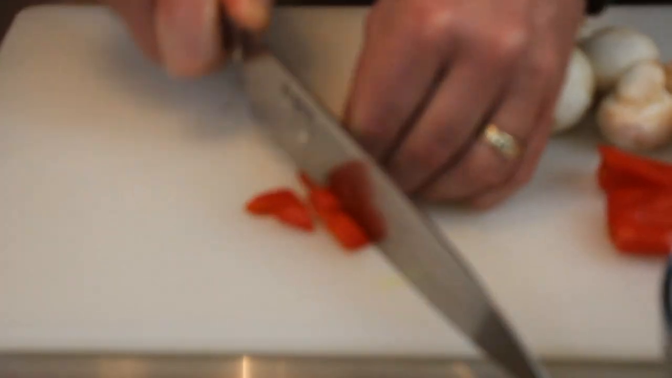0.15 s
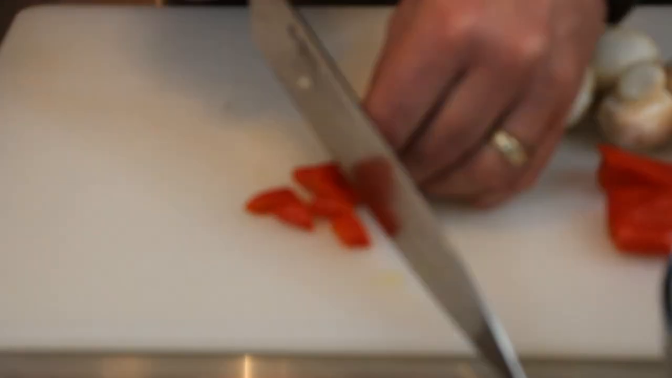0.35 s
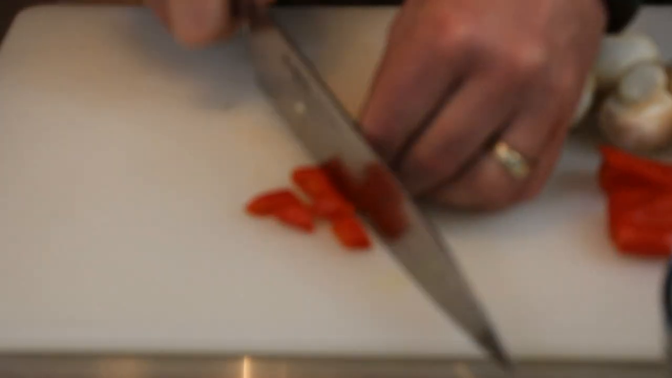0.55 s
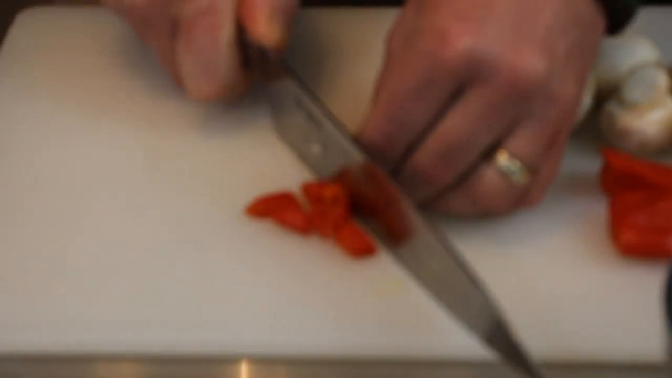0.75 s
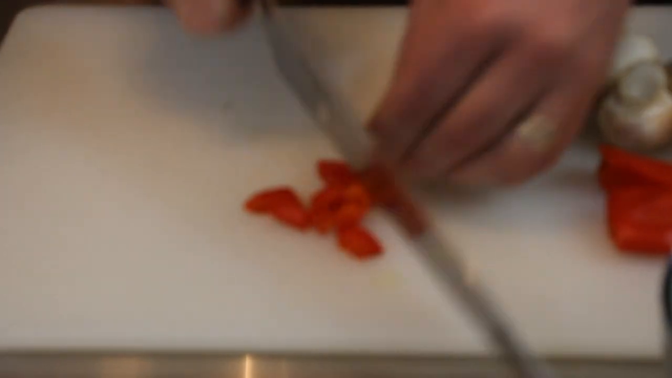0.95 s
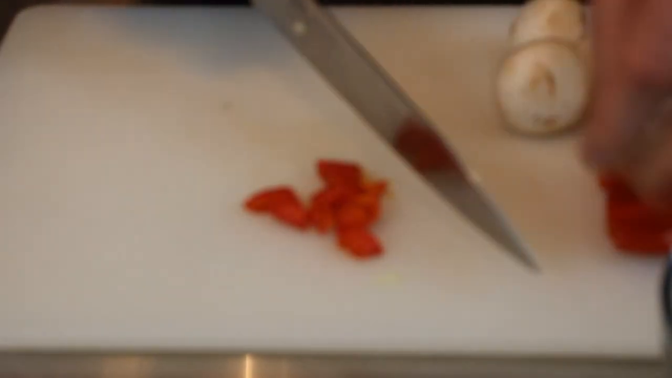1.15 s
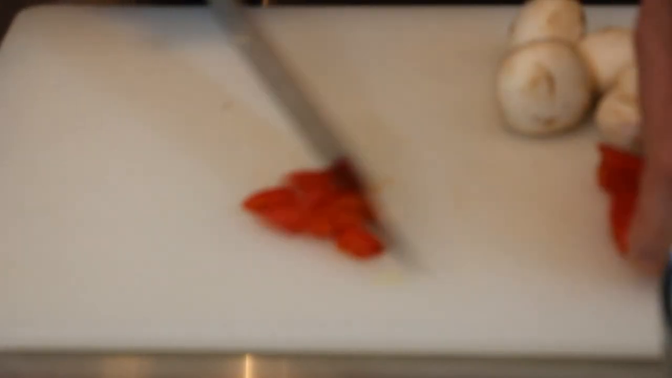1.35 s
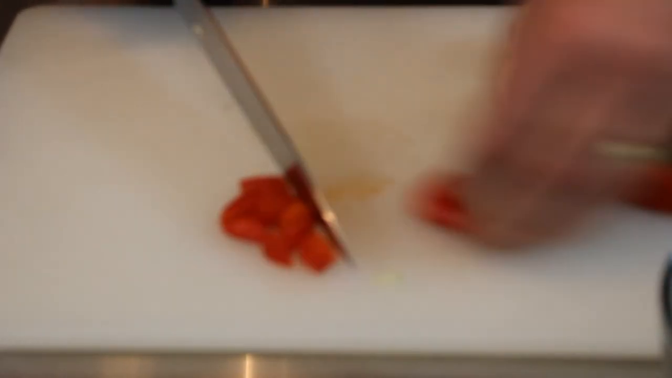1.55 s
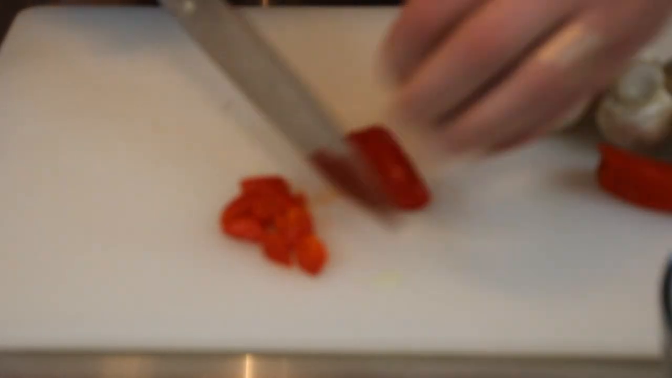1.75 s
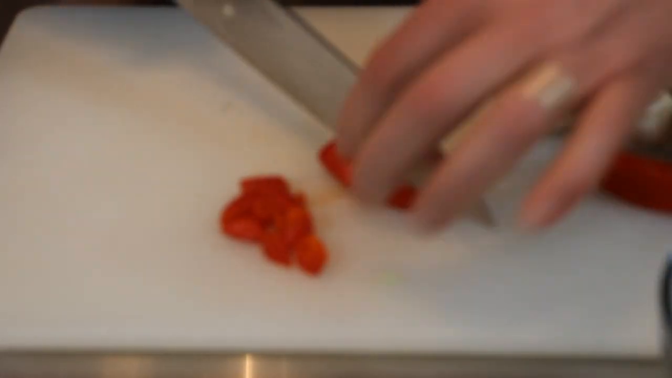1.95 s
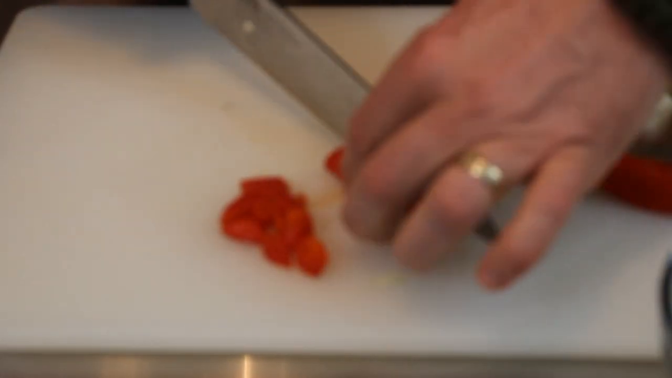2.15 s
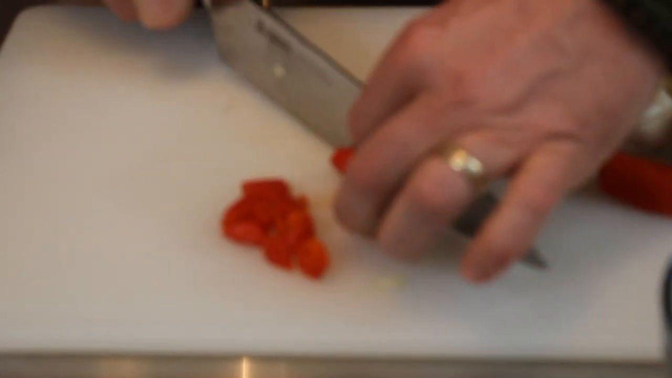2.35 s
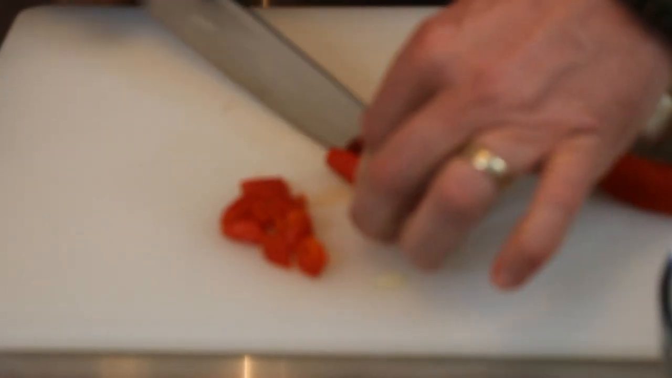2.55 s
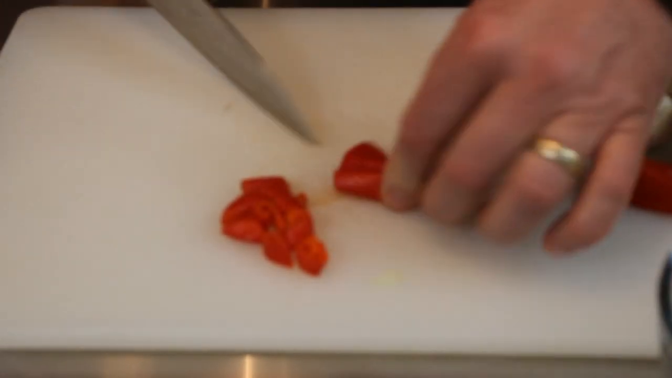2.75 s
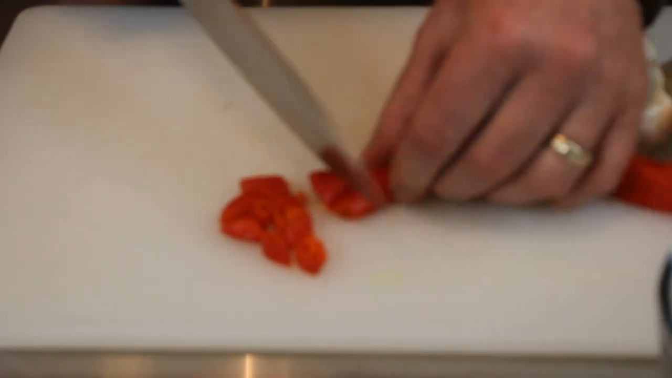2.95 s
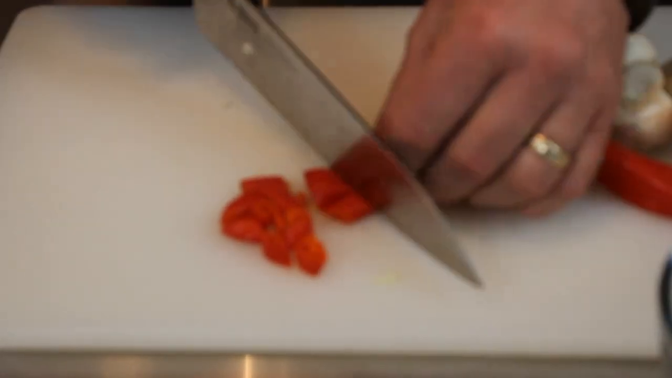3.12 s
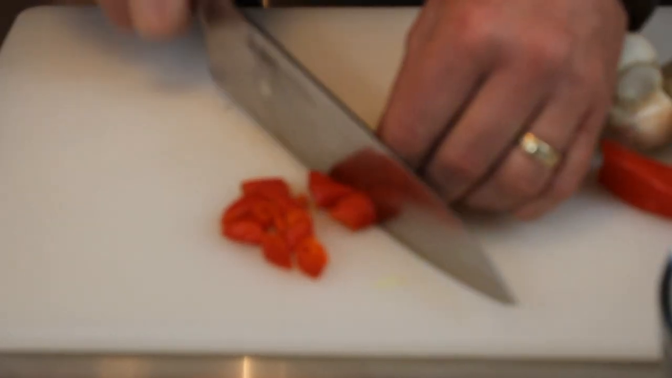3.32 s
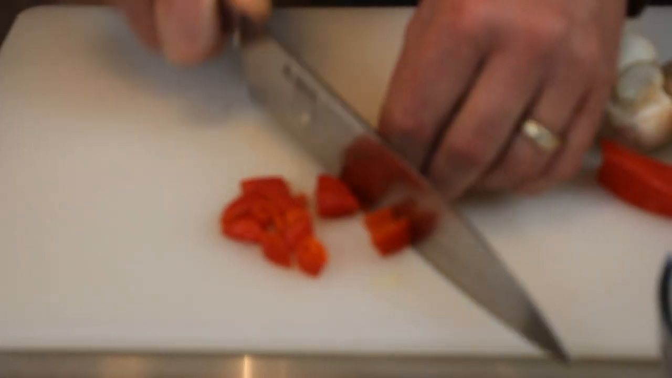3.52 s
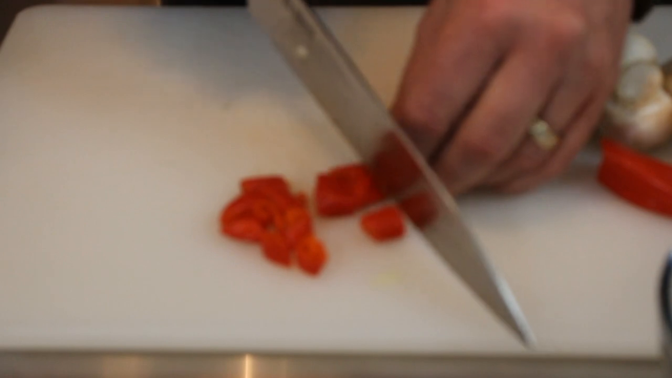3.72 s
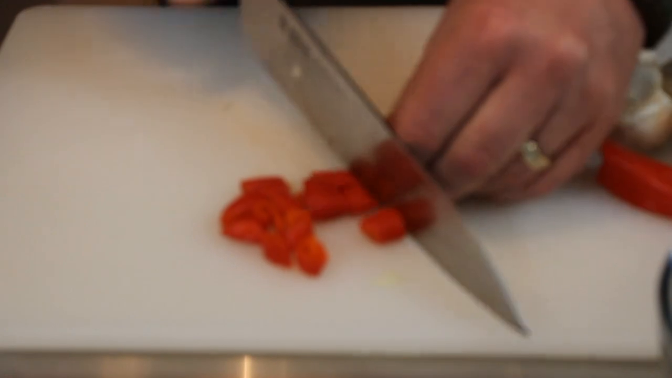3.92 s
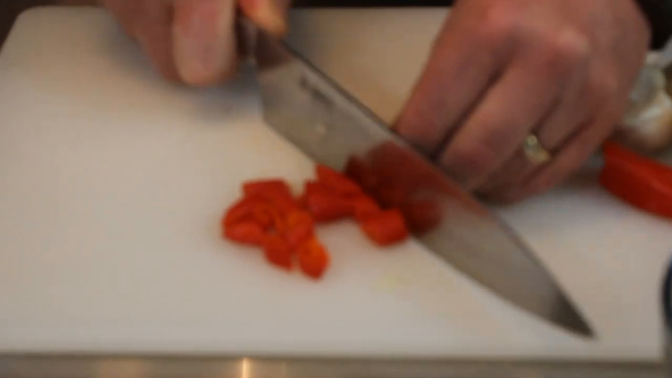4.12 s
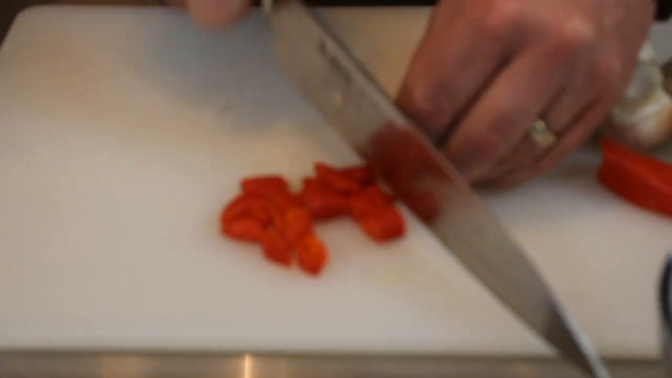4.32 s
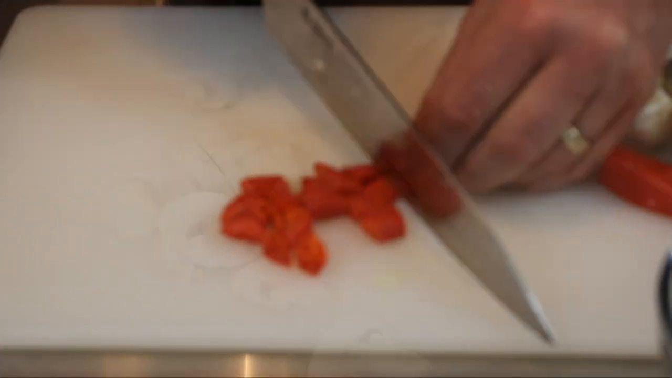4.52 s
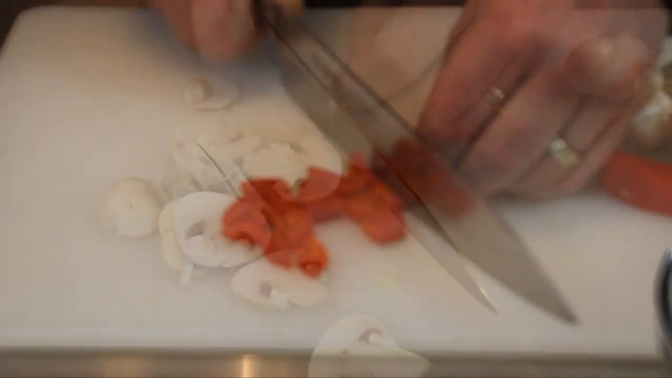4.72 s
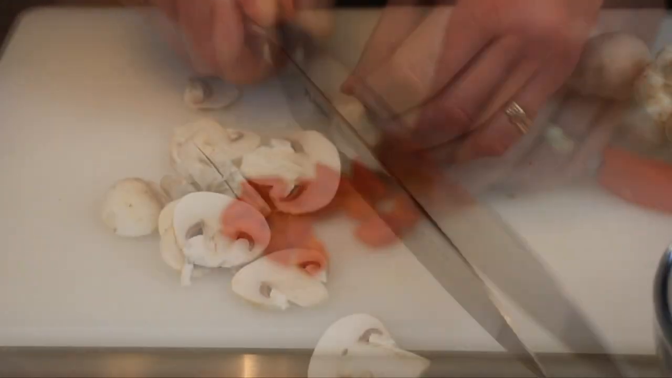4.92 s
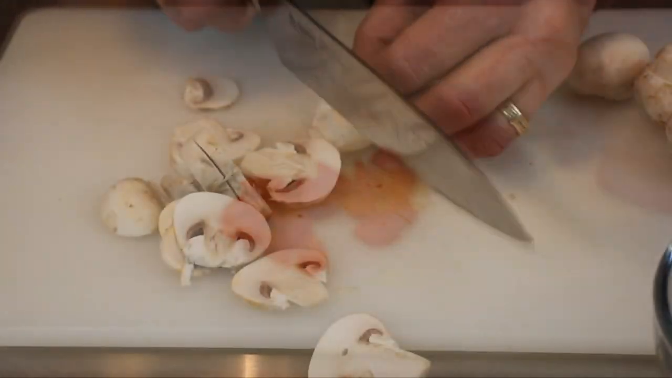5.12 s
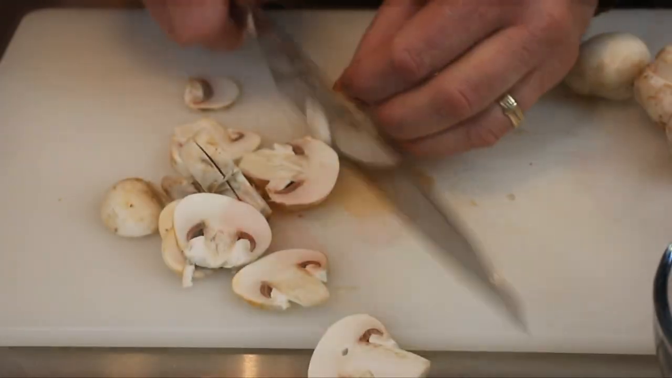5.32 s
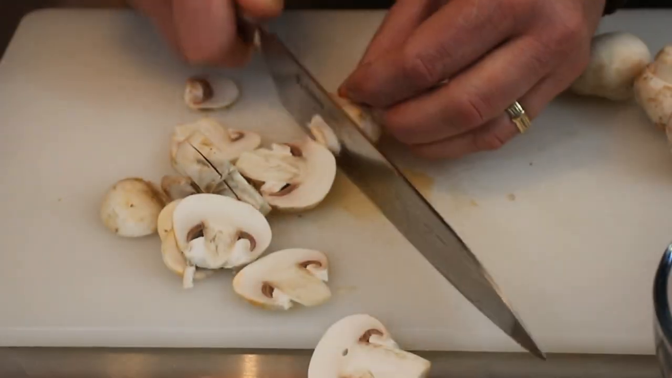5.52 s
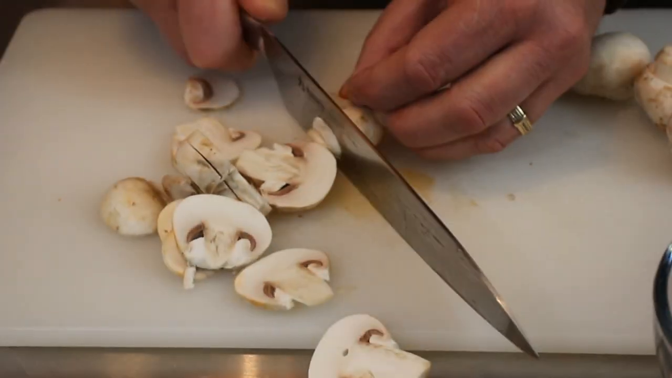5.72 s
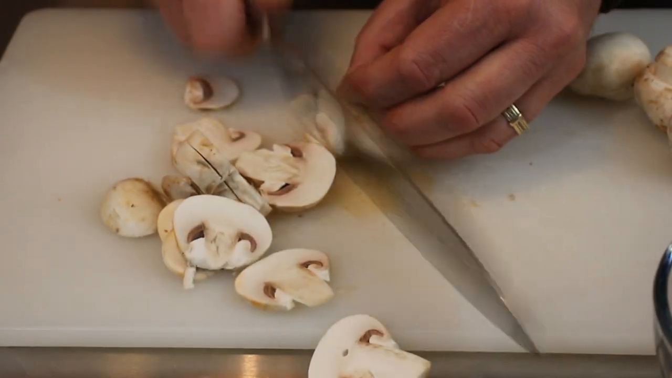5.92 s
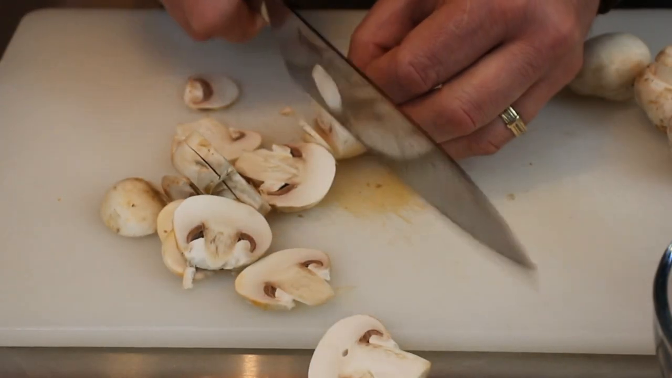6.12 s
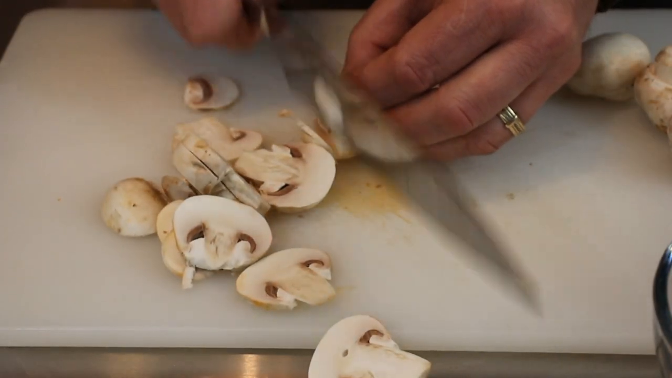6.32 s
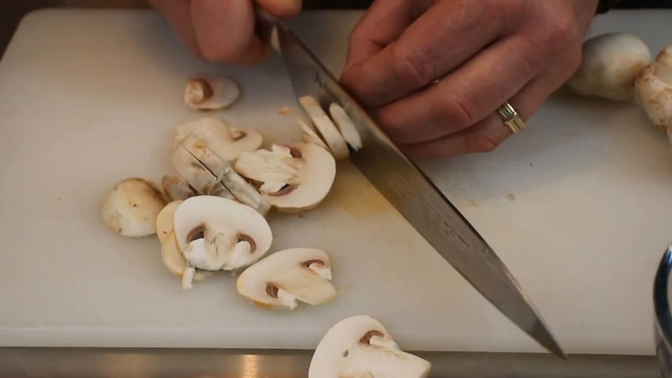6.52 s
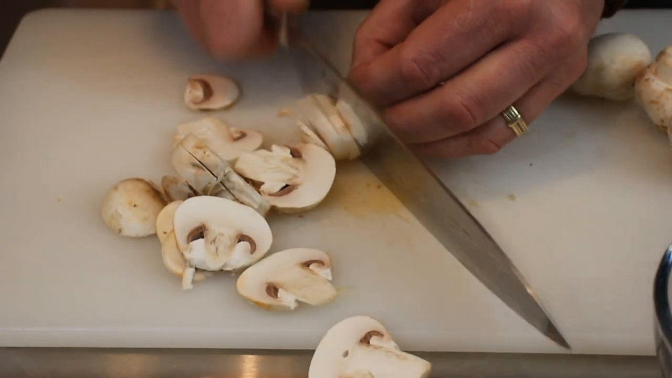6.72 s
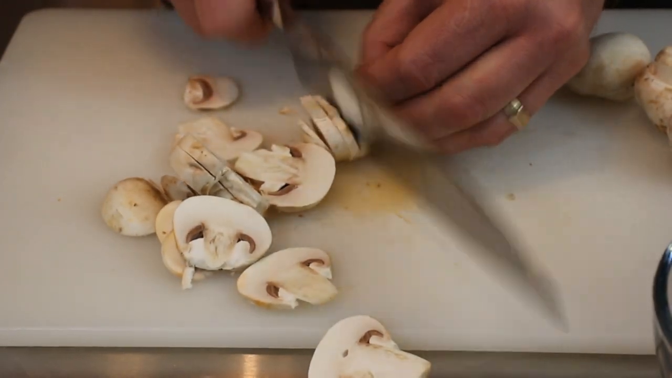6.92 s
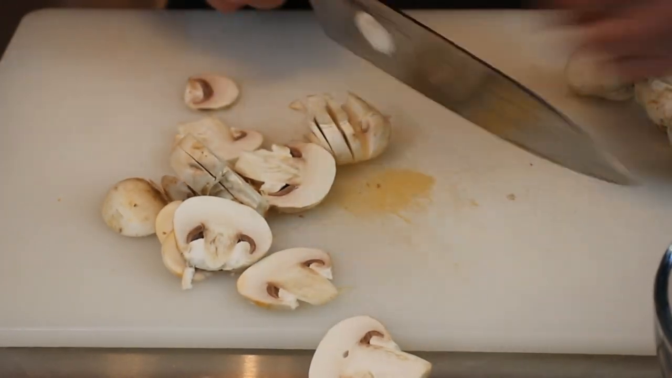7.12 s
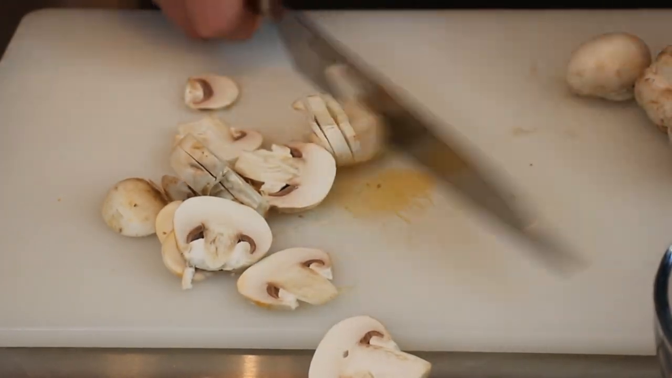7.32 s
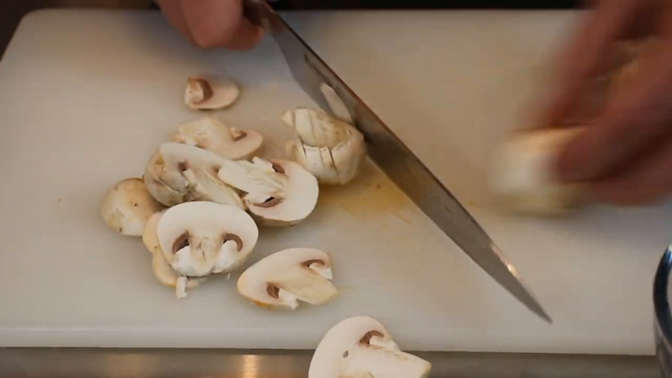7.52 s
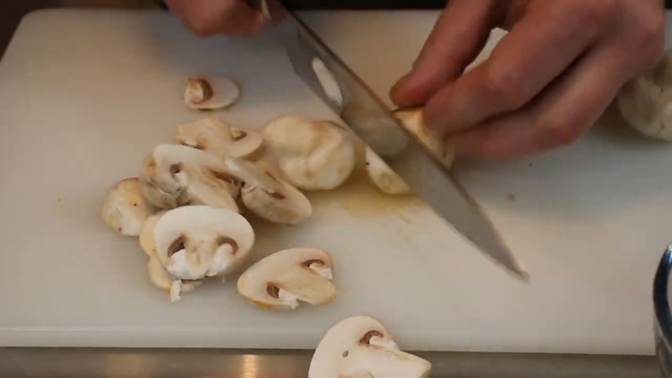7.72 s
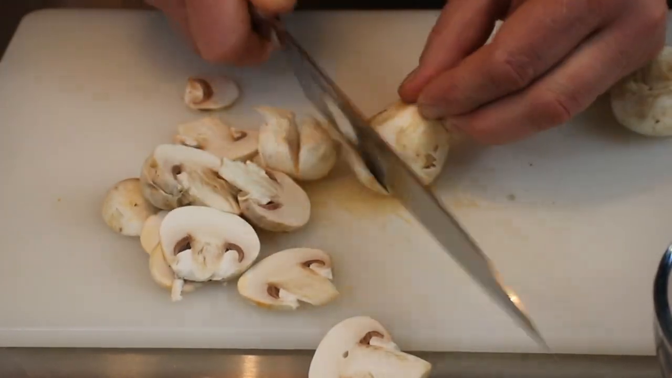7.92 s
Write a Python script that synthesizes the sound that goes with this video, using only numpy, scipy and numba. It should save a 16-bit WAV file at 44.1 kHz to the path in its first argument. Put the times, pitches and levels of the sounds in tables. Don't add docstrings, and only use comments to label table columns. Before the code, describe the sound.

Heavy woody-plastic knocks of a large blade, each with a hollow metallic counter ring and a bright kitchen echo swelling as the overloaded level recovers. Separate cuts through crisp pepper come first, with snapping skin, scraping and faint rubbing; then the ring stops suddenly and faster, even mushroom chops follow, slowing at the end. Small camera microphone within arm's reach, faint room hum, low counter thumps.

```python
import sys
import numpy as np
from scipy import signal
from scipy.fft import rfft, irfft, next_fast_len
from scipy.io import wavfile
from scipy.ndimage import map_coordinates
from numba import njit

SR = 44100
rng = np.random.default_rng(int(sys.argv[2]) if len(sys.argv) > 2 else 0)


def gain_from_decibels(decibels):
    exponent = np.asarray(decibels, float) / 20
    return 10 ** exponent


def to_wav(s):
    ch = np.atleast_2d(s).T
    pcm = np.round(np.clip(ch, -1, 1) * 32767)
    wavfile.write(sys.argv[1], SR, pcm.astype(np.int16))


N = 351036
LEAD = 8192
SCENE_CHANGE_S = 4.96187


def unit(x):
    return x / np.sqrt(np.mean(x ** 2) + 1e-20)


def along(points, hz):
    f, v = np.transpose(points)
    return np.interp(np.log(hz + 1), np.log(f + 1), v)


def filtered(x, response):
    m = next_fast_len(x.shape[-1] + LEAD)
    spectrum = rfft(x, m) * response(np.fft.rfftfreq(m, 1 / SR))
    return irfft(spectrum, m)[..., :x.shape[-1]]


def resonances(modes):
    def response(f):
        return sum(gain_from_decibels(db) * 1j * f * w / (c * c - f * f + 1j * f * w) for c, w, db in modes)
    return response


def spread(pair, spectrum, alike):
    def mid_side_gain(hz):
        turn = np.arccos(np.clip(along(alike, hz), -1, 1)) / 2
        return gain_from_decibels(along(spectrum, hz)) * [np.cos(turn), np.sin(turn)]
    mid, side = filtered(pair, mid_side_gain)
    return np.array([mid + side, mid - side])


def rasp(spectrum, grain_db, grain_s):
    knots = rng.standard_normal(int(N / SR / .0005))
    lumps = map_coordinates(knots, [np.arange(N) / SR / max(grain_s, .0006)], order=1)
    noise = rng.standard_normal(N) * gain_from_decibels(grain_db * lumps)
    return unit(filtered(noise, lambda hz: gain_from_decibels(along(spectrum, hz))))


def strokes(rows, rise_db_per_s, change_db, fall_db_per_s):
    t, power = np.arange(N) / SR, np.zeros(N)
    for start, hold, db in rows:
        span = slice(max(int((start - .6) * SR), 0), int((start + hold + 1) * SR))
        u = t[span] - start
        rise = rise_db_per_s * np.minimum(u, 0)
        drift = change_db * np.clip(u / hold, 0, 1)
        fall = fall_db_per_s * np.maximum(u - hold, 0)
        power[span] += gain_from_decibels(db + rise + drift - fall) ** 2
    return np.sqrt(power)


# frequency in Hz, t60 in s.
KITCHEN = [(150, 0.47), (400, 0.36), (1000, 0.44), (2700, 0.4), (5000, 0.38), (8000, 0.35), (14000, 0.3)]


def tail(alike):
    length = SR * 3 // 4
    hz, t, z = signal.stft(rng.standard_normal((2, length)), SR, nperseg=256)
    x = signal.istft(z * gain_from_decibels(-60 * t / along(KITCHEN, hz)[:, None]), SR, nperseg=256)[1]
    x = spread(x, [(1, 0)], alike)[:, :length]
    return x / np.linalg.norm(x[0])


# frequency in Hz, level in dB per Hz.
HUM = [(53, -38), (90, -20), (110, -3.5), (245, -0.5), (292, -13), (355, -1), (526, -10.5), (613, -8.5),
       (684, -13.5), (814, -9.5), (1030, -14), (1910, -22.5), (5200, -29.5), (15100, -43.5), (16500, -64)]
# frequency in Hz, left-right likeness.
HUM_ALIKE = [(60, 0.96), (180, 0.93), (550, 0.9), (1650, 0.42), (4970, -0.093), (15000, 0.1)]


def humming():
    return gain_from_decibels(-44) * unit(spread(rng.standard_normal((2, N)), HUM, HUM_ALIKE))


# frequency in Hz, level in dB per Hz.
SHAKE = [(11, -20), (18, 15.5), (54, 3), (70, 2.5), (91, -17), (108, -9), (130, -10), (170, -35),
         (290, -120)]
# start in seconds, hold in seconds, level in dB.
SHUDDERS = [(0, .01, -39), (.82, .01, -42), (1.3, .1, -47), (1.9, .1, -61), (2.3, .01, -47),
            (2.46, 0.049, -43.5), (2.9, .02, -54), (3.34, .01, -52), (3.48, .02, -40.5), (4.26, .01, -38),
            (4.86, .01, -37), (5.48, 0.17, -46), (5.75, .1, -41), (6, 0.95, -46), (7.03, 0.0091, -55),
            (7.43, .01, -55)]


def shaking():
    rest = gain_from_decibels(-65)
    level = rest + strokes(SHUDDERS, rise_db_per_s=106, change_db=0, fall_db_per_s=80)
    return level * gain_from_decibels(9) * unit(spread(rng.standard_normal((2, N)), SHAKE, HUM_ALIKE))


# frequency in Hz, level in dB per Hz.
HISS = [(2060, -46), (3500, -14), (4130, -2), (4650, 6.5), (5300, 3.5), (5840, 0), (6660, -2.5),
        (8000, -13), (10400, -44), (17600, -120)]
FINGERS = [(710, -35), (1200, 13), (1440, 9), (1560, 5.5), (2380, 5.5), (3410, 0), (4170, -1),
           (4770, -11.5), (6000, -34), (7800, -33), (13200, -120)]
FIZZ = [(3820, -28), (6500, -3.5), (7700, -5.5), (9990, -5.5), (11200, -10), (15100, -24), (16000, -29)]
# frequency in Hz, width in Hz, level in dB over the rub.
HELD_BLADE = [(2050, 70, 0), (2650, 80, -4), (3280, 70, 4), (3500, 60, 4), (3840, 60, 0), (4710, 70, 5)]
# start in seconds, hold in seconds, hiss in dB,
# wet-skin fizz in dB over the hiss.
TIP = [(0, .01, -38, -5), (.1, 0.18, -53, -14), (.27, 0.19, -55.5, -16), (.97, 0.53, -49, -4.5),
       (1.52, 0.17, -56, -1.5), (1.77, 0.11, -61.5, -5), (2.56, 0.21, -56.5, -1), (2.8, 0.31, -63.5, -12),
       (3.12, 0.25, -59.5, -16), (3.65, .02, -56.5, -7), (3.8, .1, -55, -5.5), (3.998, 0.011, -59, -5),
       (4.32, 0.15, -55.5, -5), (4.6, .01, -65, -17), (6.95, 0.08, -53.5, -11.5), (7.07, 0.11, -59, -3.5),
       (7.51, 0.15, -64, 5.5)]
# start in seconds, hold in seconds, level in dB.
RUBS = [(0, 0.0073, -25), (.08, 0.24, -46.5), (.33, 0.25, -51), (.97, 0.43, -50.5), (1.34, .02, -57),
        (1.55, 0.15, -50.5), (1.77, .01, -57), (2.46, .01, -68), (2.57, 0.12, -43.5), (2.74, .24, -52),
        (3.05, 0.41, -55.5), (3.5, 0.16, -53.5), (3.8, 0.073, -53.5), (4.25, 0.26, -58),
        (4.604, .01, -54.5), (5.188, .005, -57), (6.95, .12, -53), (7.12, 0.099, -56), (7.51, 0.14, -56),
        (7.7, .02, -63)]


def gliding():
    def glide(rows):
        return strokes(rows, rise_db_per_s=165, change_db=-4.5, fall_db_per_s=210)

    hiss_level = glide([row[:3] for row in TIP])
    fizz_level = glide([(s, hold, db + wet_db) for s, hold, db, wet_db in TIP])
    hiss = hiss_level * rasp(HISS, grain_db=-1.5, grain_s=0.014)
    fizz = fizz_level * rasp(FIZZ, grain_db=2.0, grain_s=0.0035)
    rub = rasp(FINGERS, grain_db=2.5, grain_s=0.0071)
    rub = unit(rub + 1.5 * filtered(rub, resonances(HELD_BLADE)))
    return hiss + glide(RUBS) * rub + fizz


# frequency in Hz, level in dB per Hz.
EDGE = [(180, -40), (300, -4.5), (713, -4), (1060, -17), (1190, -8), (1720, -18), (1870, -12),
        (10000, -30.5), (16000, -38)]
# frequency in Hz, width in Hz, level in dB over the rub.
BLADE = [(1185, 58, 0), (1400, 16, -9), (1897, 11, 8), (2520, 130, -7), (3830, 34, -4), (5350, 40, -4),
         (5750, 40, -2), (6030, 50, 5), (7740, 58, 4), (8900, 59, 7), (10040, 90, 6), (10900, 60, -13),
         (10500, 85, 6), (11700, 50, 5), (13000, 66, -15)]
# start in seconds, hold in seconds, level in dB.
SCRAPE = [
    (1.375, 0.053, -35.5),
    (7.365, 0.055, -37),
]


def scraping():
    rub = rasp(EDGE, grain_db=2.2, grain_s=.0025)
    singing = unit(rub + 2.1 * filtered(rub, resonances(BLADE)))
    return strokes(SCRAPE, rise_db_per_s=311, change_db=-1, fall_db_per_s=330) * gain_from_decibels(6.0) * singing


# frequency in Hz, level in dB per Hz.
FLESH = [(120, -33), (200, -9.5), (777, -4.5), (1080, -13.5), (1710, -11), (1940, -10), (4430, -17),
         (6520, -23), (9060, -25.5), (16000, -41)]
# time in seconds, peak in dB, pitch in Hz.
SNAPS = [(.27, -29, 5030), (0.599, -34, 4000), (.617, -28, 4000), (.6585, -24, 2500), (.675, -27, 4500),
         (2.47, -59, 9000), (2.702, -33, 10500), (2.832, -27, 3550), (3.3105, -32, 2500),
         (3.512, -37, 6940), (3.625, -36, 8900), (4, -33, 6000), (4.58, -42, 2500), (4.678, -42, 8000),
         (4.705, -26, 4970), (4.72, -43, 8000), (6.4886, -21, 2900)]
# start in seconds, length in seconds, level in dB.
SPLITS = [
    (.5975, 0.015, -36),
    (.615, 0.075, -39.5),
    (2.309, 0.015, -27.5),
    (3.3088, 0.021, -37),
    (4.709, 0.028, -40.5),
    (5.214, .04, -46.5),
    (5.482, .038, -42.5),
    (5.972, .028, -38),
    (6.4893, .022, -33),
    (7.856, 0.04, -44),
]
# start in seconds, length in seconds, level in dB.
CRUSHES = [(.656, 0.028, -32.5), (.681, .009, -25), (2.221, 0.047, -54), (2.25, 0.086, -38),
           (2.2985, 0.0063, -27), (3.33, 0.0038, -28), (3.335, 0.009, -25), (4.06, 0.019, -44),
           (4.087, 0.0078, -20.5), (4.677, 0.02, -62), (4.735, .042, -53), (4.771, 0.019, -39.5),
           (4.793, 0.0072, -22), (5.722, .025, -65), (6.213, 0.028, -57), (6.741, .038, -43.5)]


def cutting():
    abrupt = 20000
    splits = strokes(SPLITS, abrupt, change_db=-5.5, fall_db_per_s=abrupt)
    crushes = strokes(CRUSHES, abrupt, change_db=6, fall_db_per_s=1800)
    out = (splits + crushes) * gain_from_decibels(-1.06) * rasp(FLESH, grain_db=3.5, grain_s=0.0014)
    t = np.arange(512) / SR
    for s, db, hz in SNAPS:
        crack = rng.standard_normal(len(t)) * gain_from_decibels(-60 * t / 0.0079)
        out[round(s * SR):][:len(t)] += gain_from_decibels(db + 2) * filtered(crack, resonances([(hz, 0.19 * hz, 0)]))
    return out


# frequency in Hz, width in Hz, level in dB.
BOARD = [(225, 150, -5), (680, 170, 0), (1010, 110, -5), (1420, 120, -2), (1980, 120, -7), (2750, 150, 2),
         (3350, 200, -13), (4900, 500, -22)]
# frequency in Hz, level in dB, t60 in seconds.
COUNTER = [(213.9, 10.5, 0.46), (265.3, 5.5, 0.48), (350, -15.5, 0.88), (417.7, 0.5, 0.52),
           (702, -16, 0.97)]
# Hz, dB, t60 in seconds.
LONG_RING = (242, -6, 1.8)
# frequency in Hz, level in dB per Hz.
WALLS = [(53, -38), (90, -17), (192, -6.5), (310, -2.5), (647, -2), (1090, -10), (1190, -10), (1350, -7),
         (1470, -11), (2040, -13.5), (2710, -19), (11100, -44), (16000, -54)]
# frequency in Hz, left-right likeness.
ECHO_ALIKE = [(60, 0.99), (180, 0.99), (550, 0.95), (1650, 0.7), (4970, 0.37), (15000, 0.14)]
# time in seconds, peak in dB, contact in ms with the sign of
# the first swing, counter ring in dB, echo in dB.
BLOWS = [(-.04, 0, 0.26, -4.5, 0.5), (0.6893, 6.5, 0.062, 1, -7), (1.2631, -7, 0.18, 1, 2.5),
         (2.2985, -18.5, 0.26, -13, 13), (2.3086, -9.5, -0.026, 4, -12), (3.3414, -3.5, 0.087, 3, -2.5),
         (4.0944, 4.5, 0.067, 3.5, -2), (4.801, 4.5, 0.082, 4, -2.5), (5.2519, 3.5, 0.071, 0, -3),
         (5.5157, 5.5, 0.051, 1, -3), (5.753, 6.5, 0.05, 1.5, -4.5), (5.9927, 5, 0.058, 1.5, -4.5),
         (6.2363, 6.5, 0.0535, -2, -4.5), (6.5108, 3, 0.066, 4, -3), (6.7855, 5.5, 0.034, 3, -4.5),
         (7.3064, 1, 0.13, -9, -1.5), (7.889, 3, 0.072, 5, -1.5)]
# time in seconds, peak in dB, signed contact in ms.
TOUCHES = [
    (0.6862, -4, -0.071),
    (1.266, -18, 0.12),
    (3.3352, -10.5, -0.21),
    (3.344, -9.5, 0.92),
    (4.0906, -10, -0.087),
    (4.796, -8, -0.14),
    (4.7979, -7, -0.105),
]


def ringing(t, hz, db, t60):
    return gain_from_decibels(db - 60 * t / t60) * np.sin(2 * np.pi * hz * t)


def blows():
    t = np.arange(SR * 3 // 4) / SR
    out = np.zeros((2, N + LEAD + SR))
    counter = sum(ringing(t, *mode) for mode in COUNTER) * (1 - np.exp(-t / 0.072))
    loose = ringing(t, *LONG_RING) * (1 - np.exp(-t / .05))
    room = tail(ECHO_ALIKE)
    first_wall = np.clip((t - .003) / .003, 0, 1)
    touch_ring_db, touch_echo_db = -20, -19
    touches = [(*row, touch_ring_db, touch_echo_db) for row in TOUCHES]
    for s, db, ms, ring_db, echo_db in sorted(BLOWS + touches):
        push_s = 1.3 * abs(ms) / 1000
        u = np.maximum(t[:2048] - s * SR % 1 / SR, 0) / push_s
        detuned = [(c * rng.normal(1, .025), w, level + rng.normal(0, 1.8)) for c, w, level in BOARD]
        knock = filtered(u * u * np.exp(-u), resonances(detuned))
        knock = np.sign(ms) * gain_from_decibels(db + 2.0) * knock / knock.max()

        tilt = np.clip(80 * (0.065 - abs(ms)), -9, .5)
        colour = lambda hz: gain_from_decibels(along(WALLS, hz) + tilt * np.log2(1 + hz / 700))
        echo = gain_from_decibels(24.5) * filtered(room + .5 * tail(ECHO_ALIKE), colour) * first_wall

        ring = counter + (s > SCENE_CHANGE_S) * loose
        sound = gain_from_decibels(db + echo_db + 13.5) * echo + gain_from_decibels(db + ring_db - 23.5) * ring
        sound[:, :len(knock)] += knock
        if s < SCENE_CHANGE_S:
            sound[:, int((SCENE_CHANGE_S - s) * SR):] = 0
        out[:, LEAD + int(s * SR // 1):][:, :len(t)] += sound
    return filtered(out[:, LEAD:LEAD + N], lambda hz: (1j * hz / (1j * hz + 75)) ** 3)


# frequency in Hz, left-right likeness.
RUB_ALIKE = [(60, 0.75), (180, 0.97), (550, 0.99), (1650, 0.83), (4970, 0.71), (15000, 0.12)]


def scene():
    near = cutting() + scraping() + gliding()
    scattered = signal.fftconvolve(near, rng.standard_normal(128) / np.sqrt(128))[:N]
    direct = spread(np.array([near, scattered]), [(1, 0)], RUB_ALIKE)
    echo = gain_from_decibels(-6) * signal.fftconvolve(near[None], tail(RUB_ALIKE), axes=1)[:, :N]
    sound = blows() + direct + echo + humming() + shaking()
    microphone_hiss = gain_from_decibels(-74) * rng.standard_normal((2, N))
    return sound * gain_from_decibels([[-.7], [.7]]) + microphone_hiss


@njit
def follow(level, attack, release):
    out, e = np.empty_like(level), 1e-6
    for i in range(len(level)):
        e = e + attack * (level[i] - e) if level[i] > e else e * release
        out[i] = e
    return out


def gain_controlled(dry):
    parts = np.split(np.abs(dry).max(axis=0), [int(SCENE_CHANGE_S * SR)])
    attack, release = 1 / (0.0029 * SR), float(gain_from_decibels(-130 / SR))
    level = np.concatenate([follow(p, attack, release) for p in parts])
    level = np.pad(level, (48, 0), 'edge')[:N]
    return dry * np.maximum(level / gain_from_decibels(-15), 1) ** -.9


def top_cut(x):
    return signal.sosfilt(signal.butter(12, 16890, fs=SR, output="sos"), x)


def record(dry):
    x = gain_controlled(dry)
    x = filtered(x, lambda hz: 1 / np.sqrt(1 + (hz / 15900) ** 60))
    x = 1.01 * x / (1 + np.abs(x) ** 6) ** (1 / 6)
    cut = 95
    x = filtered(1.14 * x, lambda hz: -hz * hz / (cut ** 2 - hz * hz + 1.41j * hz * cut))
    return top_cut(x.clip(-1, 1))


dry = scene()
out = record(dry)
to_wav(out)
```